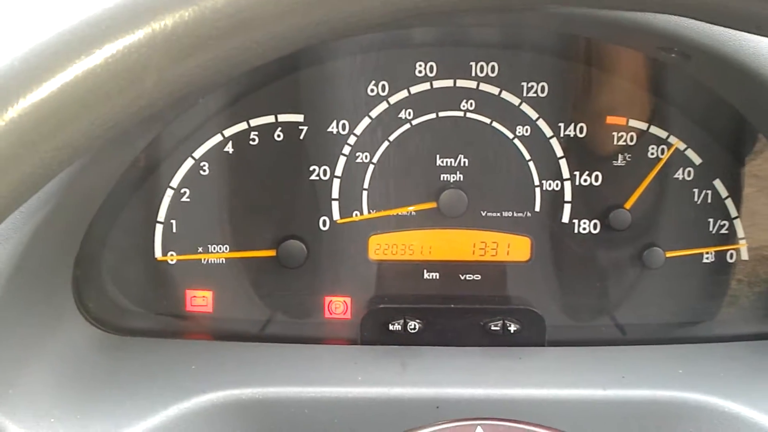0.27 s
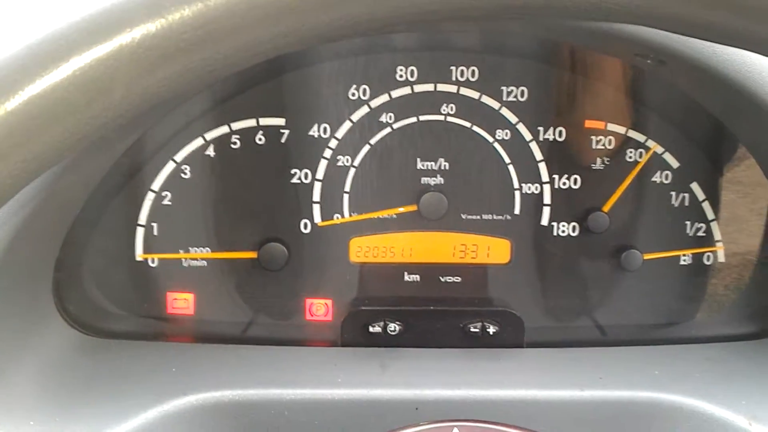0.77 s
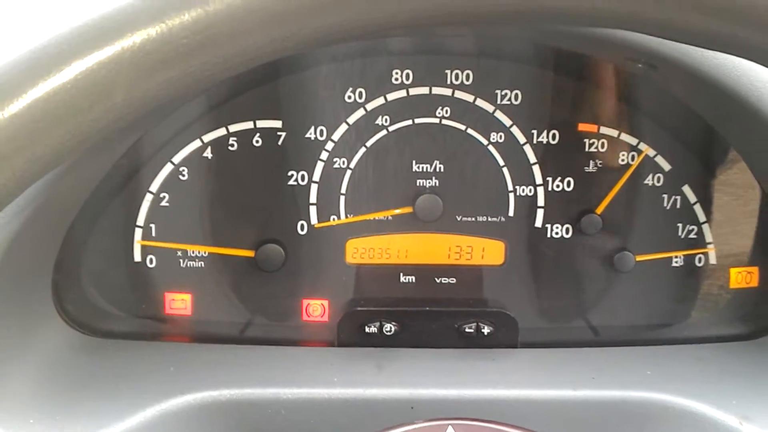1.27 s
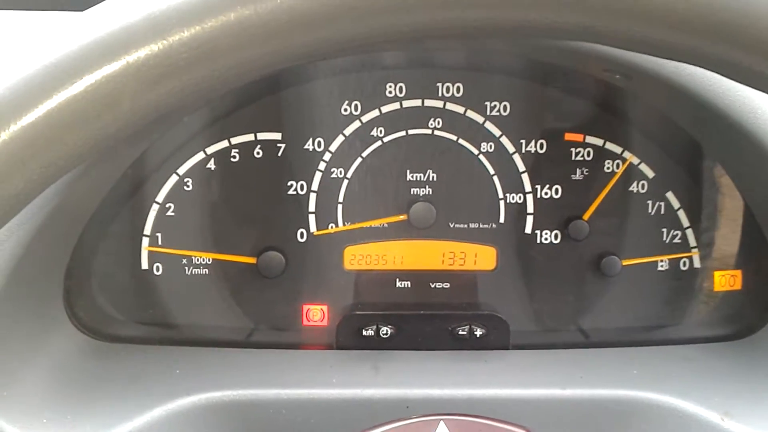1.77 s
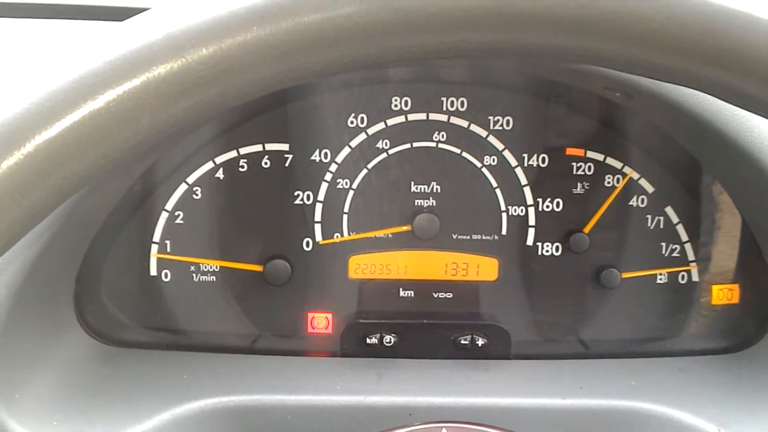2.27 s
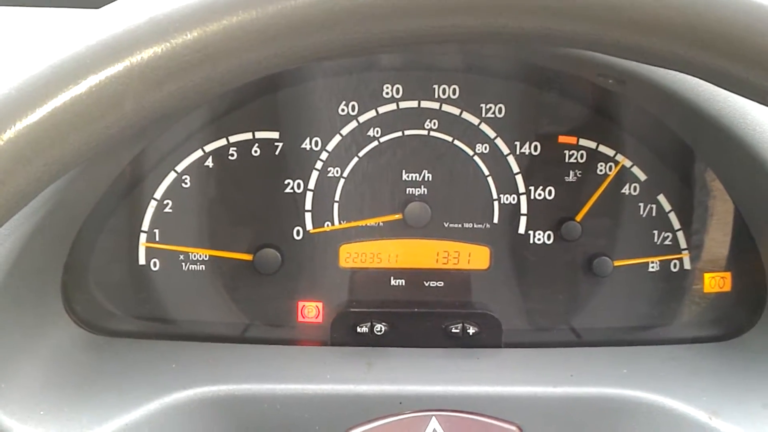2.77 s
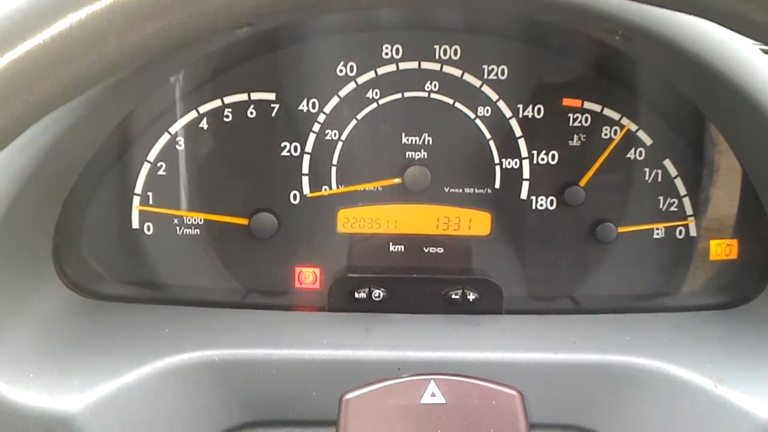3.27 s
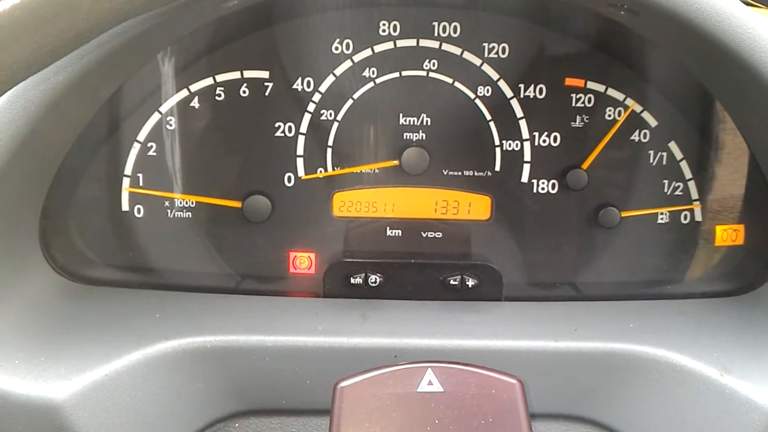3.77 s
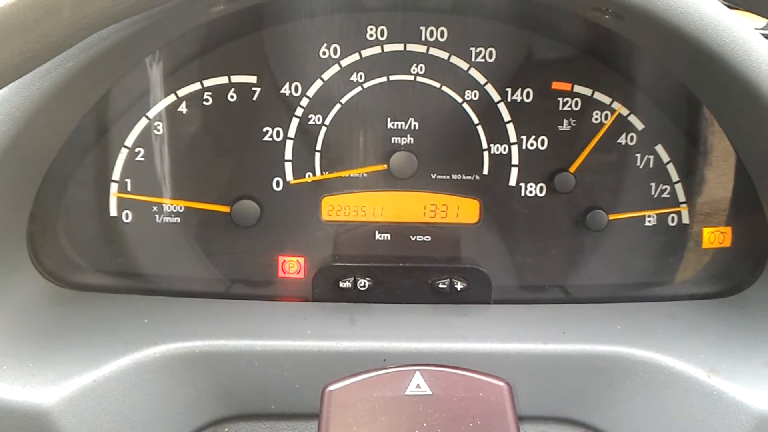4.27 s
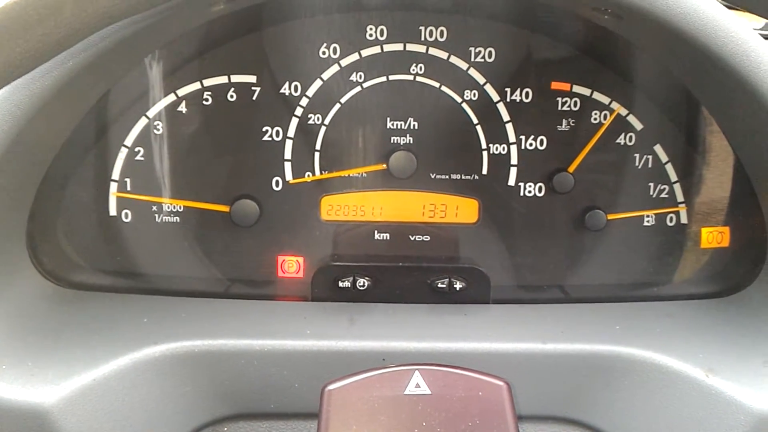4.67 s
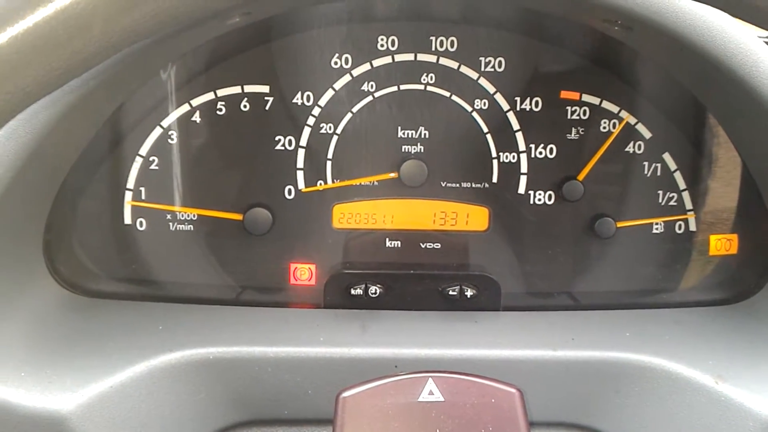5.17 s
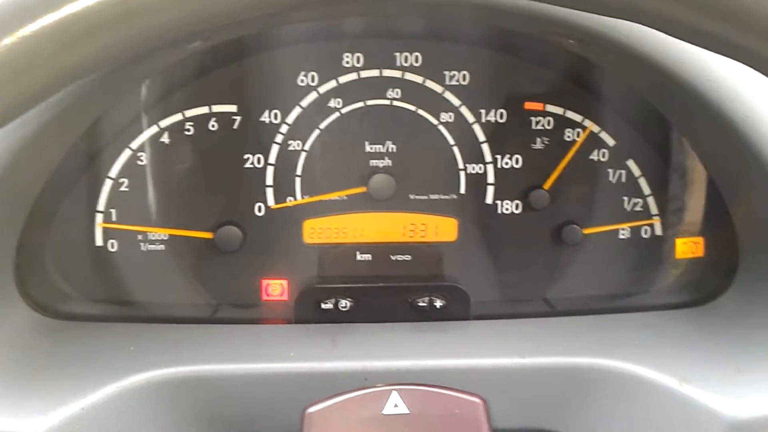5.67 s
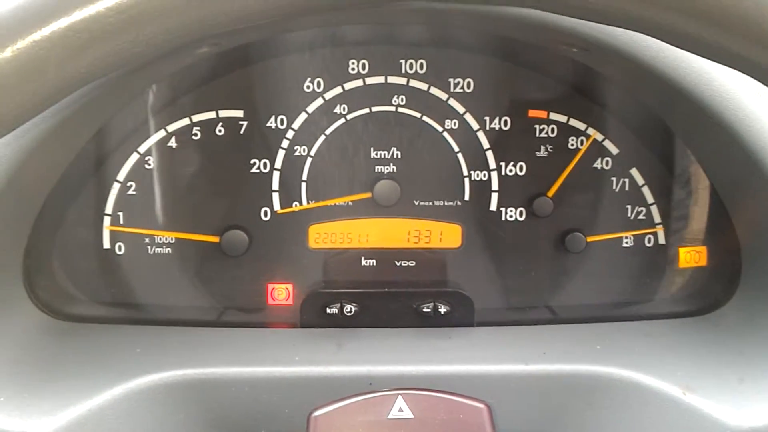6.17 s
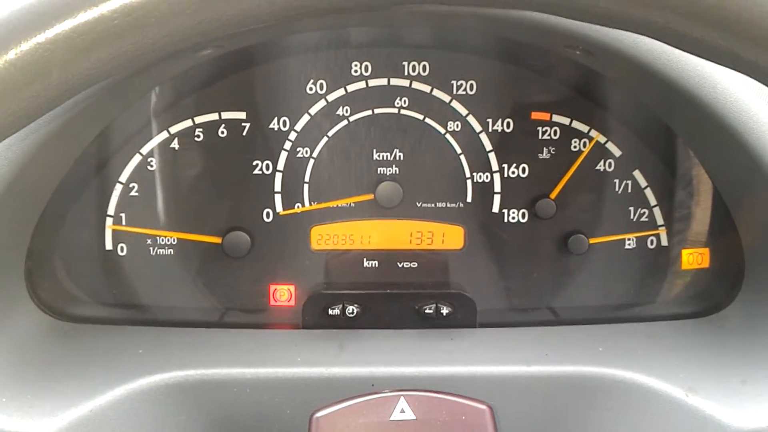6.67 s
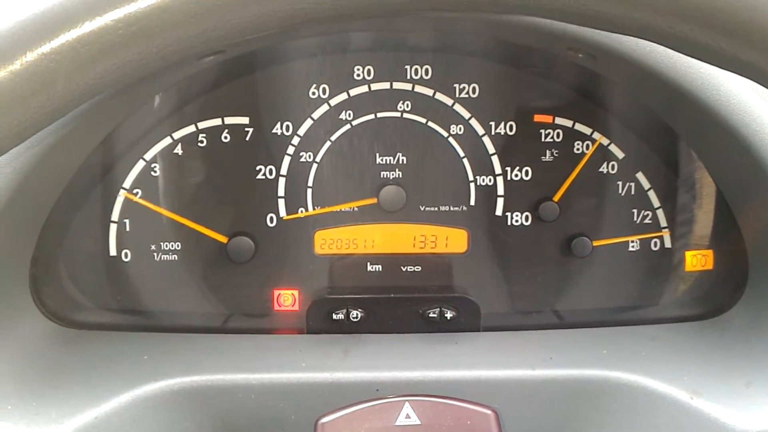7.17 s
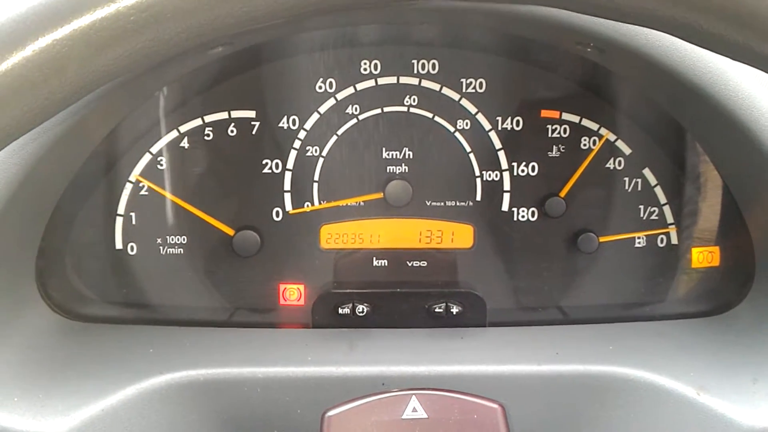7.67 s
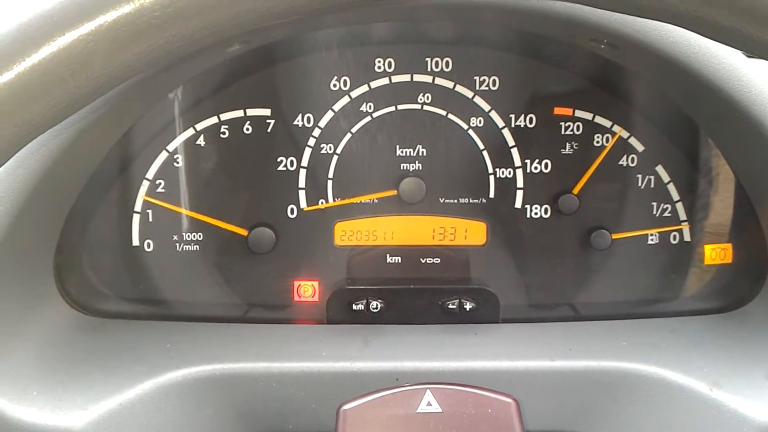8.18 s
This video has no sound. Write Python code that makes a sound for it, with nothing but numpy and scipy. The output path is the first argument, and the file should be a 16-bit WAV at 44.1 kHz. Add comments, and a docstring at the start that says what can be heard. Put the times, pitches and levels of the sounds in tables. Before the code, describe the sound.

Heard close from the driver's seat: rapid starter heaves, gritty and whining, with deep cab thuds, then a five-cylinder diesel comes alive. Small dry clicks and thin metallic key scratches follow right after. The idle is even and low, with soft ticking, hiss and panel throbs coming through the bulkhead. Late on, one swift rev raises the drone, clatter and loose-cover rattle, before the pitch slides down towards idle.

```python
"""A five-cylinder diesel engine in a truck, heard from the driver's seat, is started, idles and revs up once.
The engine is a count of firings: it drives tones, ticks, knocks and rocking, coloured by cab and bulkhead.
The starter first grinds and whines through the compressions, while the cab lurches and jolts.
Then the key clicks, its ring scrapes and the dashboard buzzes; near the end the revs rise and drop back."""
import sys
import numpy as np
from scipy import signal
from scipy.fft import rfft, irfft
from scipy.io import wavfile

SR = 44100
rng = np.random.default_rng(int(sys.argv[2]) if len(sys.argv) > 2 else 0)


def waveform_to_disk(signal):
    """Save audio, clipped to [-1, 1], as 16-bit WAV at the path in sys.argv[1]."""
    frames = np.transpose(np.atleast_2d(signal))
    scaled = np.clip(frames, -1, 1) * 32767
    samples = np.round(scaled).astype(np.int16)
    wavfile.write(sys.argv[1], SR, samples)


N = 372336
TIME, FREQS = np.arange(N) / SR, np.fft.rfftfreq(N, 1 / SR)

# pushes of the starter against compression:
# (time [s], grind level [dB], length [s], whine level [dB], sag of the gear pitch [Hz])
COMPRESSIONS = [(0.073, -49, 0.05, -46.5, 170.5), (0.234, -48.5, 0.029, -50.5, 109.5),
                (0.365, -50.5, 0.039, -50.5, 85), (0.489, -47, 0.027, -58, 70.5),
                (0.61, -53.5, 0.024, -74, 0.5), (.692, -54, .024, -66, 130), (.785, -59.5, .025, -72, 2.5)]
# colour of the grinding starter gears: (frequency [Hz], relative level [dB])
GRIND_COLOUR = [(120, -42), (200, 1.5), (260, -0.5), (378, -6.5), (560, -10.5), (703, -6.5), (815, -6),
                (1470, -14.5), (1940, -19.5), (2170, -19.5), (3110, -16.5), (6380, -26), (9910, -33),
                (12900, -74), (21800, -120)]
# resonances of the starter housing: (frequency [Hz], width [Hz], height above the rest [dB])
HOUSING = [(1445, 140, 9), (1740, 130, 7.5), (2220, 77, 14), (2550, 270, 7.5), (4080, 120, 8),
           (4840, 70, 5), (5680, 130, 5), (6130, 160, 2)]
# colour of the spinning starter: (frequency [Hz], relative level [dB])
WHIRR_COLOUR = [(880, -45), (1500, 11), (2170, 5), (2730, -6.5), (4160, -0.5), (5100, 0.5), (6370, 3.5),
                (7580, -3), (9910, -23.5), (12900, -44), (21800, -120)]
# the starter's gear mesh gathers speed and sags just after each compression
MESH_HZ, MESH_RISE_HZ_PER_S, SAG_LAG_S, SAG_S = 777, 70, .036, .034

# the cab lurches as the engine turns over and catches:
# (time [s], level [dB], swing frequency [Hz], rise time [s])
LURCHES = [(.002, -33.5, 42, 0.024), (0.146, -31, 40.4, 0.027), (.281, -32, 37.5, 0.032),
           (.405, -32, 32, 0.02), (0.501, -29.5, 31.5, 0.029), (0.599, -29.5, 39.4, .04),
           (0.718, -27, 41.2, 0.034)]
# dull jolts while the engine starts: (time [s], level [dB])
JOLTS = [(0.086, -55), (.125, -57), (.25, -50), (0.384, -53), (.5, -50), (0.68, -43.5), (0.717, -56),
         (0.774, -49.5), (0.855, -44.5)]
# colour of the jolts: (frequency [Hz], relative level [dB])
JOLT_COLOUR = [(50, -6), (110, 6.5), (170, -12), (240, -4.5), (320, -5), (450, -21.5), (800, -18),
               (2500, -74)]

# engine speed: (time [s], firing rate [firings per second])
SPEED = [(0, 7), (.55, 8), (.72, 23), (.86, 32.5), (1.17, 31.9), (1.24, 28.9), (2.25, 28.23), (6.45, 28.23),
         (6.52, 37), (6.7, 69.3), (6.9, 98.3), (7, 109.3), (7.1, 110), (7.25, 102.7), (7.4, 91),
         (7.65, 71.3), (8, 48), (8.13, 38.5), (8.3, 33.5), (8.44, 32.3)]
CYLINDERS, STRONG_FIRING_S = 5, 1.669  # the count of firings is zero at this time
LIGHT_S, LIGHT_RISE_S, FREE_S = 0.52, 0.075, 0.95  # the fuel starts to light; the engine runs free
PEDAL_DOWN_S, PEDAL_UP_S, LOAD_FALL_S = 5.9, 6.99, 0.03
# how the drone follows the engine: (level at idle [dB], rise at top revs [dB], power of the revs,
# rise at full load [dB], change while cranking [dB])
DRONE_LAW = (-51.5, 8, 1.5, 0, -5.5)
# how the clatter follows the engine: (level at idle [dB], rise at top revs [dB], power of the revs,
# rise at full load [dB], change while cranking [dB])
CLATTER_LAW = (-60.5, 13.5, 1.36, 4, -1)
# how the hiss follows the engine: (level at idle [dB], rise at top revs [dB], power of the revs,
# rise at full load [dB], change while cranking [dB])
HISS_LAW = (-65, 14, 0.78, 3.5, 1.5)
DRONE_FULL_REVS = 0.57  # share of the top revs at which the drone stops growing
# shake of the cab: level at idle, change at top revs, change at full load [dB]
SHAKE_DB, SHAKE_REVS_DB, SHAKE_LOAD_DB = -38.5, -10.5, 1.5
# brief swells and sags of the engine: (time [s], length [s], drone [dB], clatter [dB], shake [dB])
STUMBLES = [(0.66, 0.045, -14, 5, 0.5), (0.867, 0.024, -2, 4.5, 4.5), (1, 0.015, 3, -2, -6.5),
            (1.388, 0.026, 2, 3, -1.5), (1.6, 0.33, -2, -0.5, 0.5), (4.462, 0.035, -1, 2, -0.5),
            (6.454, 0.044, 6.5, 4, -1.5), (6.56, 0.049, -7.5, -6.5, 3.5), (6.833, 0.062, 0.5, -1.5, -2.5),
            (7.486, 0.12, 2, 0, -5.5), (7.774, 0.077, 1, 2.5, -6), (8.037, 0.04, -0.5, 1.5, 0),
            (8.175, 0.018, -3, -5, -3.5), (8.227, 0.035, -3.5, 2.5, -7.5), (8.427, 0.051, -4, -3.5, 2.5)]
HISS_SHARE = 1.1  # how strongly the hiss follows the clatter in a stumble

# how the cab passes the exhaust pulses: (frequency [Hz], relative level [dB])
CAB = [(60, -30), (85, 1), (100, -7), (113, -10), (141, -3), (152, -1), (164, 1), (169.5, -7), (177, 5),
       (187, -2), (198, 0), (212, -4), (228, -0.3), (240, -1), (255, -11), (283, -10.5), (330, -19),
       (390, -26), (450, -20), (530, -25), (620, -20), (1000, -50)]
# rough rumble of the cab: (frequency [Hz], relative level [dB])
RUMBLE_COLOUR = [(10, -25), (22, 3), (42, 4), (62, -2), (98, 5.5), (127, -2), (155, 4), (200, -1.5),
                 (238, 0.5), (268, -8), (300, -11), (330, -11), (380, -24), (900, -70)]
# cab panels thumped once every engine cycle:
# (frequency [Hz], relative level [dB], time to fall by 60 dB [s])
THUMP = [(175, 0, .28), (160, -8, .22), (232, -10, .08), (148, -13, .1)]
# engine noise coming through the bulkhead: (frequency [Hz], relative level [dB])
BULKHEAD = [(200, -19.5), (290, -2), (330, -8), (500, 0.7), (900, -1.5), (1500, -0.5), (2200, -2.5),
            (3000, -5.5), (4600, -8.5), (6000, -3), (7200, -5.5), (8600, -11), (10000, -22), (12500, -36)]
# resonances of block and panels: (frequency [Hz], width [Hz], height above the rest [dB])
PANELS = [(331, 120, 14), (442.5, 36, 7), (584, 100, 0.5), (617, 75, 6.5), (804, 78, 4), (972, 140, 4),
          (1246, 53, 6.5), (1430, 160, 2.5), (1472, 57, 2), (1660, 36, 3.5), (1830, 54, 5.5),
          (2420, 44, 1.5), (2440, 22, -1.5), (3430, 30, 5), (3590, 63, 6.5), (3500, 130, 1),
          (3750, 56, 1.5), (4040, 120, 5), (4740, 44, 6), (6620, 320, 2), (7130, 360, 3)]
# resonances of loose covers: (frequency [Hz], width [Hz], height above the rest [dB])
COVERS = [(1422, 410, 22), (1820, 130, 10.5), (2530, 1760, 15.5)]
# rocking of the block on its mounts: (multiple of the firing rate, relative level [dB])
ROCKING = [(.4, -34), (.8, -13), (1, 0), (1.2, -20), (1.4, -28), (1.6, -27), (1.8, -22), (2, -11)]
# cab resonances that the firing rate sweeps through: (frequency [Hz], width [Hz], height [dB])
SWAY = [(37.5, 7, 9.5), (56.5, 14, 2), (87, 15.5, 8)]

# clicks of the ignition key and a relay:
# (time [s], level [dB], time to fall by 60 dB [s], relative level of the ring [dB], dullness [0-1])
CLICKS = [(.8345, -38, .03, -24, .05), (.8604, -49, .04, -24, .7), (1.0924, -46, .035, -7, .85),
          (1.1523, -59, .05, -10, .3), (1.2094, -66, .04, -2, 0)]
# colour of the clicks: (frequency [Hz], relative level [dB])
CLICK_COLOUR = [(200, -5), (700, 10), (1800, 1), (3500, 6), (6000, 5), (8500, 5), (11000, -30),
                (15000, -50)]
KEY_RING_HZ = 7740
# keys scraping on their ring: (time [s], level [dB], length [s])
SCRAPES = [(0.846, -56.5, .018), (1.01, -63, 0.02), (1.335, -61.5, 0.0082), (1.375, -57.5, 0.012),
           (1.509, -59, .008)]
# colour of the scrapes: (frequency [Hz], relative level [dB])
SCRAPE_COLOUR = [(400, -47), (2000, 0), (3800, 1), (5800, 6), (8500, -1), (10500, -15), (12500, -24),
                 (15000, -40)]
EDGE_HZ = 15700  # upper limit of the finished sound


def amp(db):
    """Turns decibels into gain."""
    return 10 ** (np.asarray(db) / 20)


def unit(x):
    """Scales a signal to an average (rms) strength of 1."""
    return x / np.sqrt(np.mean(x ** 2) + 1e-20)


def curve(rows):
    """Turns the columns of a table into curves over time."""
    s, *columns = np.transpose(rows)
    return [np.interp(TIME, s, column) for column in columns]


def read(points, hz):
    """Reads a spectrum in dB between its points, with pitch on a logarithmic scale."""
    f, db = np.transpose(points)
    return np.interp(np.log(hz + 1), np.log(f), db)


def bumps(modes, at_hz=FREQS):
    """Adds up resonance peaks in dB."""
    return sum(db / (1 + (2 * (at_hz - hz) / width) ** 2) for hz, width, db in modes)


def fade_above(hz, power):
    """A spectrum in dB that falls away above a frequency."""
    return -10 * np.log10(1 + (FREQS / hz) ** power)


def fade_below(hz):
    """A spectrum in dB that falls away below a frequency."""
    return -10 * np.log10(1 + (hz / (FREQS + 1)) ** 4)


def colour(x, db):
    """Filters without looking ahead, so resonances ring after each blow; the result has rms 1."""
    log_gain = irfft(np.log(amp(np.maximum(db, -100))), N)
    # fold the second half onto the first: all ringing then comes after its cause
    log_gain[1:N // 2] *= 2
    log_gain[N // 2 + 1:] = 0
    return unit(irfft(rfft(x) * np.exp(rfft(log_gain)), N))


def noise():
    """White noise."""
    return rng.standard_normal(N)


def resonant_noise(hz, width):
    """Noise gathered around one resonance."""
    return colour(noise(), -20 * np.log10(1 + (2 * (FREQS - hz) / width) ** 2))


def wander(hz):
    """A slow random drift of rms 1."""
    return unit(irfft(rfft(noise()) * np.exp(-(FREQS / hz) ** 2), N))


def swell(s, length):
    """A bell-shaped rise and fall."""
    return np.exp(-np.minimum(((TIME - s) / length) ** 2 / 2, 50))


def strikes(cycles):
    """A click each time the count passes a whole number."""
    return np.diff(np.floor(cycles), prepend=np.floor(cycles[0]))


def starter(whirr_db=-56, rough=0.65, release_s=0.93):
    """Gears grind and whine louder at each compression, then sag in pitch; the spinning motor whirrs."""
    grind = sum(amp(db) * swell(s, length) for s, db, length, _, _ in COMPRESSIONS)
    whine = sum(amp(db) * swell(s, 0.5 * length) for s, _, length, db, _ in COMPRESSIONS)
    sag = sum(sag_hz * swell(s + SAG_LAG_S, SAG_S) for s, _, _, _, sag_hz in COMPRESSIONS)
    mesh_hz = MESH_HZ + MESH_RISE_HZ_PER_S * TIME - sag
    mesh = 2 * np.pi * np.cumsum(mesh_hz) / SR + rough * wander(77)
    gears = amp(-7) * np.sin(mesh / 2) + np.sin(mesh)
    gears += amp(-13) * np.sin(2 * mesh) + amp(-18) * np.sin(3 * mesh)
    # one blow for every second cycle of the mesh, mixed with uneven noise
    blows = unit(strikes(mesh / (4 * np.pi)) * amp(3.4 * noise()))
    scraping = noise() * amp(2 * wander(190))
    teeth = colour(blows + scraping, read(GRIND_COLOUR, FREQS) + bumps(HOUSING) + fade_above(5000, 2))
    whirr_path = read(WHIRR_COLOUR, FREQS) + bumps(HOUSING) * (FREQS > 3000) + fade_below(3000)
    whirr = colour(noise() * amp(2.0 * wander(110)), whirr_path)
    engaged = np.clip((release_s - TIME) / 0.048, 0, 1)
    return grind * teeth + whine * unit(gears) + engaged * amp(whirr_db) * whirr


def lurches():
    """Each heave of the block sets the cab swinging; the swing builds and then dies away."""
    out = np.zeros(N)
    for s, db, hz, rise in LURCHES:
        t = np.clip(TIME - s, 0, 1)
        envelope = t / rise * np.exp(1 - t / rise)
        out -= amp(db) * envelope * np.sin(2 * np.pi * hz * t)
    return out


def pedal():
    """Load from 0 to 1: it builds while the pedal is down and dies away on release."""
    build = np.clip((TIME - PEDAL_DOWN_S) / (PEDAL_UP_S - PEDAL_DOWN_S), 0, 1)
    return build * np.exp(-np.maximum(TIME - PEDAL_UP_S, 0) / LOAD_FALL_S)


def loudness(law, revs, load):
    """Level in dB of one part: it rises with revs and load, and is offset until the fuel lights."""
    idle_db, revs_db, power, load_db, cranking_db = law
    cranking = 1 - np.clip((TIME - LIGHT_S) / LIGHT_RISE_S, 0, 1)
    return idle_db + revs_db * revs ** power + load_db * load + cranking_db * cranking


def stumbles():
    """Short swells and sags, in dB, of the drone, the clatter and the shake."""
    return sum(np.outer([drone_db, clatter_db, shake_db], swell(s, length))
               for s, length, drone_db, clatter_db, shake_db in STUMBLES)


def engine(split_hz=3300, flutter_db=0.5, whistle_db=-13, whistle_hz=3640):
    """The count of firings times the parts of the engine; revs and load set how loud they are."""
    rate, = curve(SPEED)
    firings = np.cumsum(rate) / SR
    firings -= np.interp(STRONG_FIRING_S, TIME, firings)
    idle_rate = np.median(rate)
    revs = np.clip(np.log(rate / idle_rate) / np.log(rate.max() / idle_rate), 0, 1)  # 0 idle, 1 top
    load, free_revs = pedal(), revs * np.clip(TIME - FREE_S, 0, 1)
    drone_revs = np.minimum(free_revs / DRONE_FULL_REVS, 1)

    drone_swell, clatter_swell, shake_swell = stumbles()
    drone_level = loudness(DRONE_LAW, drone_revs, load) + drone_swell
    clatter_level = loudness(CLATTER_LAW, free_revs, load) + clatter_swell
    hiss_level = loudness(HISS_LAW, free_revs, load) + HISS_SHARE * clatter_swell
    shake_level = SHAKE_DB + SHAKE_REVS_DB * revs + SHAKE_LOAD_DB * load + shake_swell

    # the bulkhead passes a lower band (body) and a treble band (hiss) with levels of their own
    path_db = read(BULKHEAD, FREQS) + bumps(PANELS) + small_modes() + fade_below(200)
    treble = (FREQS / split_hz) ** 4 + 1e-9
    body = colour(clatter(firings, rate), path_db - 10 * np.log10(1 + treble))
    ticking = clatter(firings, rate, tick_db=-15.5, knock_db=-4.5, lope_db=0.44)
    hiss = colour(ticking + injectors(firings), path_db - 10 * np.log10(1 + 1 / treble))
    # a thin unsteady whistle rides on the hiss
    whistle = np.sin(2 * np.pi * whistle_hz * TIME + 0.24 * wander(10.0))
    hiss += amp(whistle_db - 10 * revs + 4.2 * wander(17)) * whistle

    sound = amp(drone_level) * (drone(firings, rate, drone_revs) + thumps(firings, revs))
    sound += amp(clatter_level + flutter_db * wander(35)) * body
    sound += amp(hiss_level + 1.0 * wander(12.3)) * hiss
    sound += rattle(firings, free_revs, load) + wallow(revs) + shake(firings, rate, revs, shake_level)
    return sound + growl(firings, rate, free_revs) + boom(free_revs, load)


def drone(firings, rate, revs, tone_db=-2.3, tone_revs_db=3.3, between_db=-16, between_revs_db=14,
          rumble_db=-6.3, rumble_revs_db=-3.5, waver=.06, count=110):
    """Engine tones sweep through cab resonances over a rumble; those between firing tones grow to a growl."""
    tones, power = np.zeros(N), np.zeros(N)
    drift = [wander(6.1) for _ in range(CYLINDERS + 2)]
    uneven = amp(between_db + between_revs_db * revs)
    speeds = np.linspace(rate.min(), rate.max(), 400)  # a coarse grid saves work
    for k in range(CYLINDERS + 2, count):
        gain = np.interp(rate, speeds, amp(read(CAB, speeds * k / CYLINDERS)))
        if k % CYLINDERS:  # not a multiple of the firing rate
            gain = gain * uneven
        phase = 2 * np.pi * ((k * firings / CYLINDERS + rng.random()) % 1)
        phase += waver * (1 + 2 * revs) * drift[k % len(drift)]
        tones += gain * np.cos(phase.astype(np.float32))
        power += gain ** 2 / 2
    tones /= np.sqrt(power)  # even loudness at every speed
    rumble = colour(noise(), read(RUMBLE_COLOUR, FREQS))
    return amp(tone_db + tone_revs_db * revs) * tones + amp(rumble_db + rumble_revs_db * revs) * rumble


def thumps(firings, revs):
    """Once every engine cycle a blow sets the cab panels booming."""
    t = TIME[:SR // 4]
    ring = sum(amp(db - 60 * t / t60) * np.sin(2 * np.pi * hz * t) for hz, db, t60 in THUMP)
    ring = ring * (1 - np.exp(-t / 0.0096))  # large panels take a moment to swing
    blows = strikes((firings - 1) / CYLINDERS) * (1 + 0.039 * wander(4.7))
    return amp(-5.3 - 7 * revs) * unit(signal.oaconvolve(blows, ring)[:N])


def clatter(firings, rate, tick_db=-7, knock_db=-2.5, knock_decay=0.027, lope_db=0.24, count=30):
    """Valves and injectors tick at set crank angles over a noise that dips briefly at each firing."""
    ticks, play = np.zeros(N), firings / CYLINDERS + 0.00023 * wander(18)
    for k, (angle, size) in enumerate(rng.random((count, 2))):
        ticks += (-1) ** k * (.5 + size) * strikes(play + (k + angle) / count)
    ticks = unit(ticks / np.sqrt(rate))  # more ticks a second, each one weaker
    # the decay is a share of the time from one firing to the next
    knocks = noise() * amp(knock_db * np.exp(-(firings % 1) / knock_decay) + 0.78 * wander(43))
    lope = amp(lope_db * np.cos(2 * np.pi * (firings - 3.4) / CYLINDERS))  # once every engine cycle
    return (unit(knocks) + amp(tick_db) * ticks) * lope


def small_modes(ripple_db=1.1, width_hz=18):
    """Many weak panel resonances ripple the spectrum at random."""
    window = np.hanning(int(2 * width_hz / FREQS[1]))
    return ripple_db * unit(signal.oaconvolve(rng.standard_normal(len(FREQS)), window, "same"))


def injectors(firings, snap_db=-11, scatter_db=3, decay=0.13):
    """An injector snaps shut once per firing: a tiny burst of noise, never twice the same."""
    snaps = noise() * np.exp(-((firings + 0.28) % 1) / decay) * amp(scatter_db * wander(21))
    return amp(snap_db) * unit(snaps)


def rattle(firings, revs, load, idle_db=-71, revs_db=13, load_db=3, scatter_db=3.5, t60=0.049):
    """Each firing knocks the loose covers, some much harder than others, hardest under load."""
    blows = strikes(firings) * amp(scatter_db * np.clip(noise(), -2, 2))
    bursts = noise() * signal.oaconvolve(blows, amp(-60 * TIME[:SR // 8] / t60))[:N]
    level = idle_db + (revs_db + load_db * load) * revs ** 2
    level += 8.3 * swell(0.67, 0.051)  # a brief louder rattle during the start
    return amp(level) * colour(bursts, bumps(COVERS) + fade_above(6000, 10))


def wallow(revs, db=-45, hz=36, width=15):
    """At high revs the whole cab sways irregularly on its lowest resonance."""
    return amp(db) * revs * resonant_noise(hz, width)


def shake(firings, rate, revs, level_db, uneven=0.037, revs_uneven=0.4, mount_hz=52):
    """The block rocks with the firings and its uneven cylinders; soft mounts weaken the fast swings."""
    rock, power = np.zeros(N), np.zeros(N)
    for multiple, db in ROCKING:
        k = round(multiple * CYLINDERS) / CYLINDERS
        gain = amp(db) / np.sqrt(1 + (k * rate / mount_hz) ** 4)
        lag = rng.random() if k > 1 else 0
        rock += gain * np.cos(2 * np.pi * (k * firings - lag))
        power += gain ** 2 / 2
    running = np.clip((TIME - .83) / 0.023, 0, 1)
    unsteady = 1 + uneven * wander(5.3) + revs_uneven * revs * wander(9.4)
    return rock / np.sqrt(power) * running * amp(level_db + bumps(SWAY, rate)) * unsteady


def growl(firings, rate, revs, db=-46.0, multiple=.8, rough=0.1):
    """With the revs, the second crankshaft order swells just below the firing tone on cab resonances."""
    k = round(multiple * CYLINDERS) / CYLINDERS
    level = amp(db + bumps(SWAY, k * rate)) * revs ** 3 * (1 + rough * wander(6.1))
    return level * np.cos(2 * np.pi * k * firings + rough * wander(7.7))


def boom(revs, load, db=-50, hz=175, width=10, full_revs=.55):
    """Above idle the largest cab panel booms on its own note, most when the engine coasts."""
    return amp(db) * np.minimum(revs / full_revs, 1) * (1 - load / 2) * resonant_noise(hz, width)


def jolts(t60=0.35):
    """Dull knocks through the body while the engine starts: bursts of low noise that die away."""
    thud = colour(noise(), read(JOLT_COLOUR, FREQS))
    return thud * sum(amp(db - 60 * np.clip(TIME - s, 0, 1) / t60) * (TIME > s) for s, db in JOLTS)


def clicks(dull_hz=2500):
    """Short dry snaps of noise, bright or dull, some with a thin metal ring."""
    out = np.zeros(N)
    bright = colour(noise(), read(CLICK_COLOUR, FREQS))
    dull = colour(noise(), read(CLICK_COLOUR, FREQS) + fade_above(dull_hz, 4))
    for s, db, t60, ring_db, dullness in CLICKS:
        t = np.clip(TIME - s, 0, 1)
        snap = np.sqrt(1 - dullness) * bright + np.sqrt(dullness) * dull
        ring = amp(ring_db - 60 * t / 0.12) * np.sin(2 * np.pi * KEY_RING_HZ * t)
        out += amp(db) * (t > 0) * (snap * amp(-60 * t / t60) + ring)
    return out


def scrapes(grain_db=1.5):
    """Keys slide against each other as the hand lets go: short grainy scratches of noise."""
    grains = colour(noise() * amp(grain_db * wander(400)), read(SCRAPE_COLOUR, FREQS))
    return grains * sum(amp(db) * swell(s, length) for s, db, length in SCRAPES)


def buzz(s=1.138, db=-61, length=0.034, hz=710, width=140):
    """A brief hollow buzz from the dashboard: a swell of noise around one resonance."""
    return amp(db) * swell(s, length) * resonant_noise(hz, width)


def scene():
    """Everything as it reaches the driver's seat, in one channel."""
    return (starter() + lurches() + engine() + jolts() + clicks() + scrapes() + buzz())[None]


def record(dry):
    """Removes everything above the upper frequency limit."""
    low_pass = signal.firwin(511, EDGE_HZ, window=("kaiser", 9), fs=SR)
    return signal.oaconvolve(dry, low_pass[None], "same")


dry = scene()
out = record(dry)
waveform_to_disk(out)
```